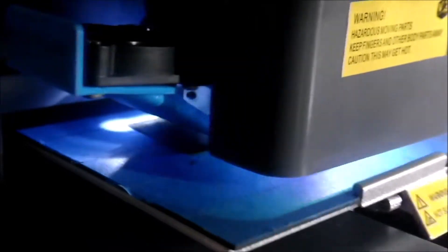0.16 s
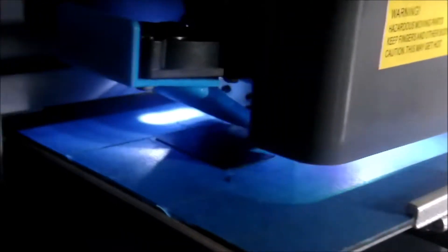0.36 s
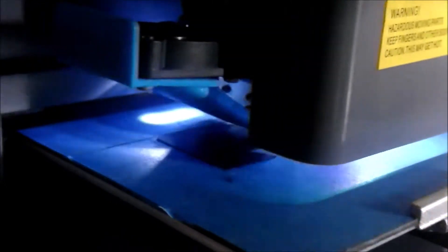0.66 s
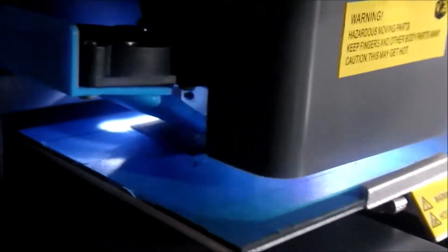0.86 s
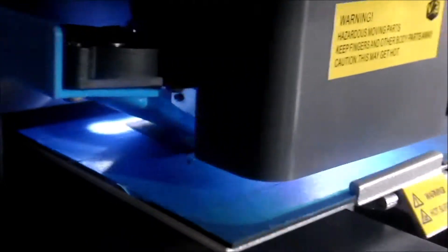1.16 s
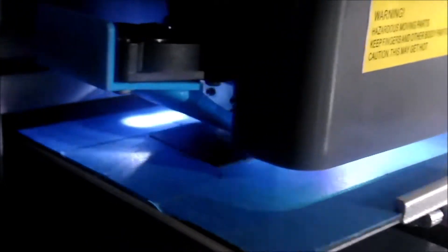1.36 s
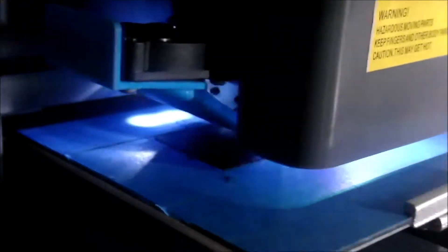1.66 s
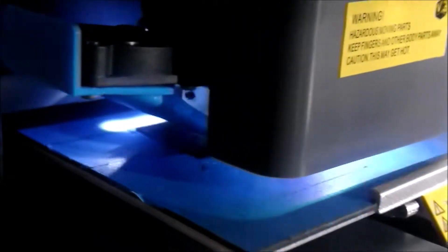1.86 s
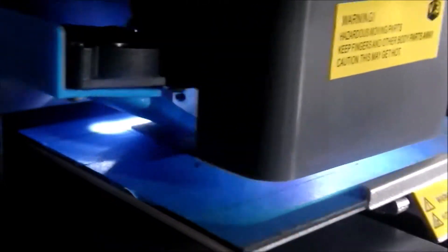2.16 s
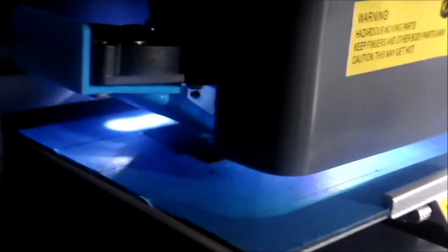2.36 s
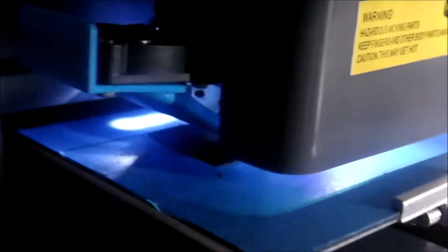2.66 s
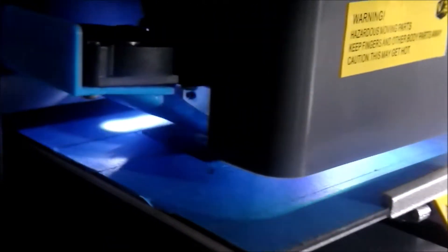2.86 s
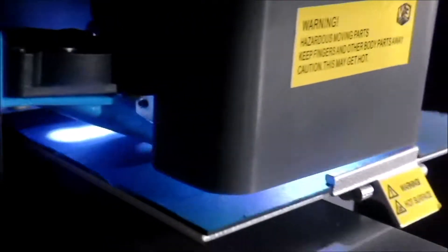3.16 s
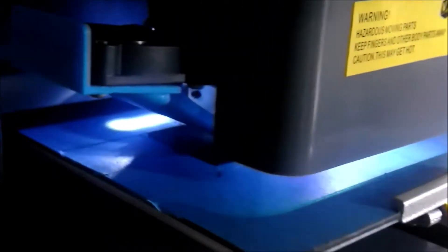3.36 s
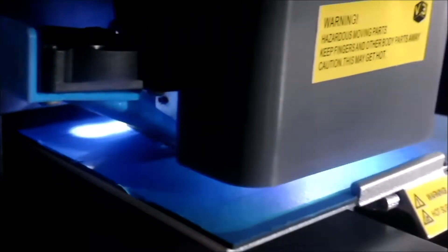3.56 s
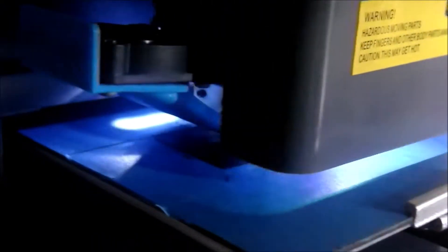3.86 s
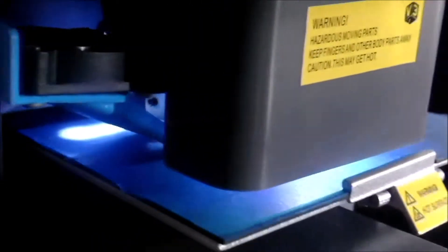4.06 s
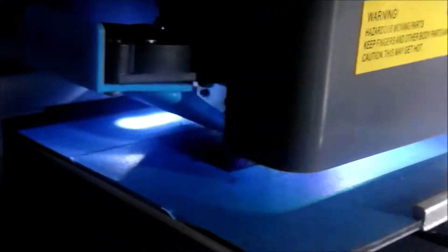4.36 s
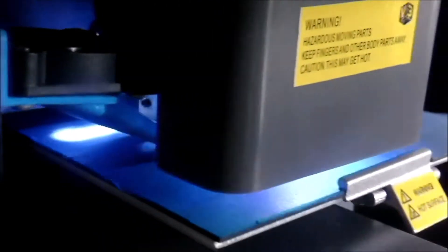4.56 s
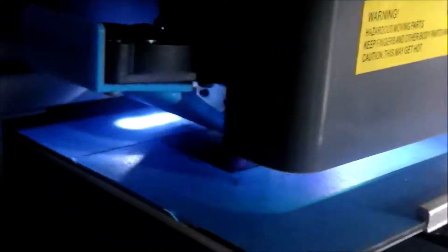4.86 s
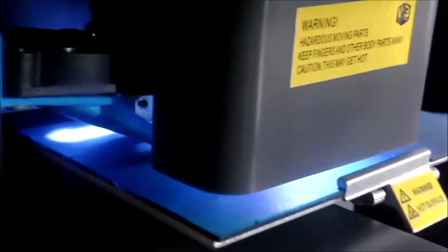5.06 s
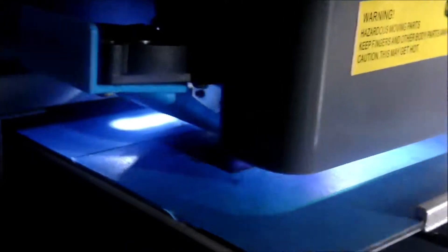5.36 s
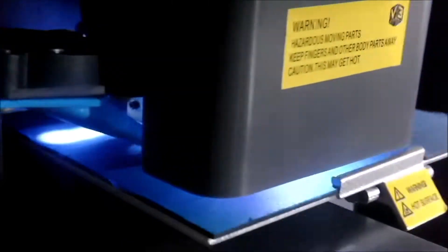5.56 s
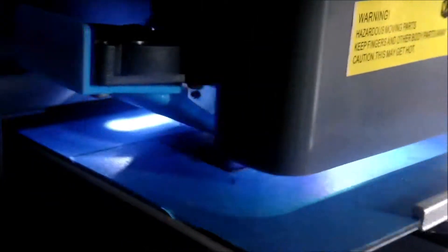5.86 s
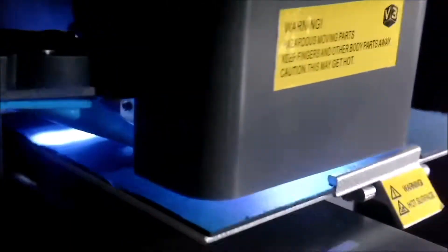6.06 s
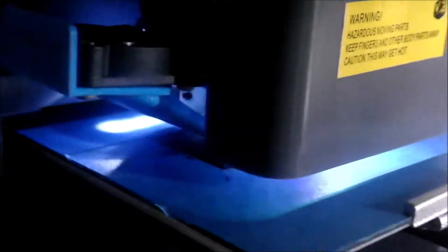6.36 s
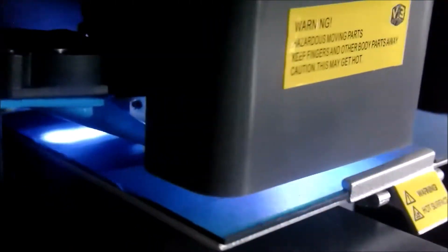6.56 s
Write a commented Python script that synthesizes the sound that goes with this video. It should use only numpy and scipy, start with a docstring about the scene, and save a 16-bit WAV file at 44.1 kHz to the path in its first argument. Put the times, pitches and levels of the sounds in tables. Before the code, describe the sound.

Close by, a small 3D printer whines and rattles through rapid short strokes, jolting at every reversal over constant airy fan noise.

```python
"""Desktop 3D printer at work

A desktop 3D printer fills a layer in short back-and-forth strokes, heard in mono from nearby.
The stepper motors whine at multiples of their step rate; each turn slows them and jolts the frame.
A loose part on the carriage buzzes with the steps and clacks, as filtered noise and cosines.
Sharp ticks ring out; behind all this, shaped noise and steady tones make fans and driver whistles."""
import sys
import numpy as np
from scipy import signal
from scipy.fft import rfft, irfft
from scipy.io import wavfile
from scipy.ndimage import uniform_filter1d

SR = 44100
rng = np.random.default_rng(int(sys.argv[2]) if len(sys.argv) > 2 else 0)


def generate_wav(sig):
    """Save sig (samples, or channels by samples) to the path in sys.argv[1] as 16-bit PCM at SR."""
    pcm = np.round(np.clip(np.atleast_2d(sig).T, -1, 1) * 32767).astype(np.int16)
    wavfile.write(sys.argv[1], SR, pcm)


N = 296352  # length in samples
T = np.arange(N) / SR  # time in s
STEP_HZ = 640.8  # motor steps per second at cruising speed


def amp(db):
    """Turn decibels into an amplitude factor."""
    return 10 ** (np.asarray(db) / 20)


def evened(x):
    """Scale a signal to rms 1."""
    return x / np.sqrt(np.mean(x ** 2) + 1e-20)


def drift(hz):
    """Smooth random wander of rms 1; changes faster than about hz fade away."""
    spectrum = rfft(rng.standard_normal(N))
    rolloff = 1 + (np.fft.rfftfreq(N, 1 / SR) / hz) ** 4
    return evened(irfft(spectrum / rolloff, N))


def resonate(x, hz, width):
    """Two-pole resonance of gain 1 at its centre; a narrow width [Hz] rings longer."""
    r = np.exp(-np.pi * width / SR)
    feedback = [1, -2 * r * np.cos(2 * np.pi * hz / SR), r * r]
    return signal.lfilter([(1 - r * r) / 2, 0, (r * r - 1) / 2], feedback, x)


def body(x, modes):
    """A solid body answers a push with several resonances at once."""
    return sum(amp(db) * resonate(x, hz, width) for hz, width, db in modes)


def multiples(phase, orders):
    """Cosines locked to the step cycle, each wandering in level and slightly in phase."""
    return sum(amp(db + 2.8 * drift(30)) * np.cos(k * phase + 0.01 * k * drift(40))
               for k, db in orders)


# colour of the air noise, only its shape counts: (frequency [Hz], relative level [dB per Hz])
FANS = [(15, -50), (30, -24.5), (95, -26.5), (300, -23.5), (430, -25), (650, -15.5), (820, -20.5),
        (1400, -16), (2100, -18), (3100, -11.5), (4200, -18.5), (5500, -11.5), (6700, -14.5), (7400, -29),
        (9500, -21), (11500, -21.5), (14500, -27.5), (15800, -24.5)]
# air ducts boost or notch the noise: (frequency [Hz], width [Hz], change [dB])
DUCT = [(960, 320, 7), (1757, 166, 8.5), (2285, 360, 9.5), (3146, 110, 5), (490, 130, 3.5), (560, 28, -5),
        (826, 50, -27), (1416, 73, -2.5), (3700, 200, -2)]
FANS_DB = -47  # rms


def fans():
    """Air noise with drifting patches and a level flicker, coloured by the ducts."""
    frames, hz = N // 256 + 5, np.fft.rfftfreq(1024, 1 / SR)
    real, imaginary, patches = rng.standard_normal((frames, 513, 3)).T
    patches = evened(uniform_filter1d(uniform_filter1d(patches, 10, 0), 8, 1))
    colour_hz, colour_db = np.transpose(FANS)
    db = np.interp(np.log(hz + 1), np.log(colour_hz + 1), colour_db)
    db = db + sum(change_db / (1 + (2 * (hz - centre) / width) ** 2) for centre, width, change_db in DUCT)
    flicker = evened(uniform_filter1d(rng.standard_normal(frames), 3))
    spectrum = (real + 1j * imaginary) * amp(db[:, None] + 1.45 * patches + 1.54 * flicker)
    air = signal.istft(spectrum, nperseg=1024, noverlap=768)[1][:N]
    return amp(FANS_DB) * evened(air)


# steady fan hums and driver whistles: (frequency [Hz])
TONES_HZ = [480, 807.5, 914.5, 961, 1007, 1305.5, 1519.4, 1602, 1822, 2610.9, 3006, 3936.5, 9350, 10622,
            11077, 11169, 11716.8, 11810, 12264.5, 12813, 13000, 15074, 15622.5]
# the same tones in the same order: (mean level [dB], rms pitch waver [Hz])
TONES = [(-74, 8), (-73, 1), (-64, 6), (-74, 3), (-63, 4), (-67, 1), (-69, 3), (-71, 5), (-67, 9),
         (-57, .8), (-68, 4), (-70, 3), (-72, 12), (-79, 3), (-76, 3), (-55, 1.8), (-54, 1.2), (-76, 3),
         (-62, 1.5), (-75, 2), (-80, 3), (-81, 1.5), (-77, 1.5)]


def tones():
    """Fan hums and driver whistles, each wavering a little in pitch and level."""
    out = 0
    for hz, (db, waver_hz) in zip(TONES_HZ, TONES):
        level = np.sqrt(2) * amp(db + 1.17 * drift(35))
        phase = 2 * np.pi * np.cumsum(hz + waver_hz * drift(20.6)) / SR
        out = out + level * np.cos(phase)
    return out


# sharp ticks: (time [s], ring level before its fade [dB], ring pitch [Hz], time to fade by 60 dB [s],
# snap peak [dB])
TICKS = [(1.5003, -36, 4050, .025, -25), (1.501, -29, 4090, 0.018, -32), (1.5035, -35, 2590, .03, -38),
         (1.5078, -30.5, 3260, 0.025, -38), (1.8445, -32, 3950, 0.025, -36), (1.8385, -37, 3700, .03, -44),
         (1.849, -32, 3200, 0.032, -40), (1.853, -36, 3170, .02, -39)]


def ticks():
    """A bright snap and a short rough ring: a sine mixed with noise around its pitch."""
    out, t = np.zeros(N), T[:3000]
    for (s, db, hz, t60, snap_db), noise in zip(TICKS, rng.standard_normal((len(TICKS), len(t)))):
        rough = np.sin(2 * np.pi * hz * t) + 0.67 * resonate(noise, hz, 1600)
        ring = amp(db - 60 * t / t60) * rough * np.minimum(t / 0.0011, 1)
        burst = noise * np.exp(-t / 0.00098)
        snap = resonate(resonate(burst, 4100, 7000), 4900, 8000)
        out[round(s * SR):][:len(t)] += ring + amp(snap_db) * snap / abs(snap).max()
    return out


# turns of the carriage, the first one starting an outward stroke: (time [s], low jolt peak [dB],
# low jolt pitch [Hz], middle peak [dB], upper peak [dB]); peaks are before the bass is cut
TURNS = [(0.094, -48, 515, -41, -38), (0.244, -51, 527, -39, -38.5), (0.402, -45.5, 474, -39, -38),
         (0.561, -39, 520, -43, -39), (0.725, -45.5, 493, -39, -34), (0.887, -44, 519, -43.5, -35.5),
         (1.048, -44, 490, -39, -40), (1.211, -44.5, 522, -48, -36.5), (1.375, -42, 477, -39, -35.5),
         (1.534, -41.5, 518, -41, -38), (1.699, -53, 470, -46, -39), (1.86, -44.5, 496, -38, -41),
         (2.026, -42.5, 490, -41, -36), (2.184, -40, 523, -41.5, -35), (2.35, -55, 474, -42.5, -39),
         (2.512, -52, 470, -42, -37.5), (2.672, -43, 450, -37, -36.5), (2.829, -42, 515, -44, -40),
         (2.996, -44.5, 472, -40, -34), (3.154, -44, 480, -41, -37), (3.235, -39.5, 523, -39.5, -43),
         (3.319, -55, 540, -43, -36), (3.472, -45, 477, -39.5, -36.5), (3.709, -43.5, 466, -35.5, -38),
         (3.946, -51, 477, -42, -37), (4.188, -48, 494, -38.5, -36), (4.43, -44, 480, -43, -37),
         (4.672, -39, 518, -40.5, -34.5), (4.922, -48, 518, -57, -41), (5.172, -41, 466, -44, -35),
         (5.42, -46.5, 533, -41, -38.5), (5.662, -49, 500, -46, -38), (5.9, -63, 490, -39.5, -38),
         (6.135, -46.5, 507, -46, -38), (6.374, -48, 492, -42, -37), (6.614, -45.5, 494, -41, -37)]
# low ringing modes of the frame: (frequency [Hz], width [Hz], relative level [dB])
LOWER = [(480, 25, 1.5), (524.5, 37, -0.5), (715, 23, 10)]
# middle ringing modes of the frame: (frequency [Hz], width [Hz], relative level [dB])
MIDDLE = [(908, 12, -1.5), (1002, 28, 3.5), (1042, 33, 4.5), (1128, 47, -7)]
# upper ringing modes of the frame: (frequency [Hz], width [Hz], relative level [dB])
UPPER = [(1350, 57, -3), (1650, 43, 5.5), (1837, 13.7, 12), (2390, 220, 1.5), (2900, 36, -2)]
MIDDLE_HZ, MIDDLE_SPREAD_HZ = 1034, 35  # mean pitch of the middle push and its chance from turn to turn


def jolts():
    """Each turn sways and shakes the frame for a few milliseconds and its modes ring out."""
    out, t = np.zeros(N + 4000), T[:4000]
    chance = rng.standard_normal((len(TURNS), len(t) + 1))
    for (s, low_db, hz, middle_db, upper_db), (spread, *noise) in zip(TURNS, chance):
        shake = noise * np.exp(-((t - .009) / 0.013) ** 2)
        middle_hz = MIDDLE_HZ + MIDDLE_SPREAD_HZ * spread
        low_push = np.sin(2 * np.pi * hz * t) * np.exp(-((t - .009) / 0.0058) ** 2)
        middle_push = np.sin(2 * np.pi * middle_hz * t) * np.exp(-((t - .006) / 0.0036) ** 2)
        low = body(low_push + 1.76 * shake, LOWER)
        middle = body(middle_push + 3.7 * shake, MIDDLE)
        upper = body(shake, UPPER) + 0.12 * resonate(shake, 1900, 3400)
        bands = (low_db, low), (middle_db, middle), (upper_db, upper)
        # each jolt begins 4 ms before the listed time
        out[round((s - .004) * SR):][:len(t)] += sum(amp(db) * x / abs(x).max() for db, x in bands)
    bass_cut = signal.butter(4, 410, "high", fs=SR, output="sos")  # the low end below about 410 Hz is cut away
    return signal.sosfilt(bass_cut, out[:N])


# the loose part clacks: (time [s], peak level [dB])
CLACKS = [(0.4065, -32.5), (0.4379, -34.5), (0.7337, -35), (0.9477, -38.5), (1.0545, -33), (1.3309, -32.5),
          (1.3558, -35), (1.5374, -36), (1.6362, -38), (1.702, -31.5), (1.8452, -41), (1.9405, -33.5),
          (2.0293, -32), (2.6005, -38), (2.6289, -34), (2.6768, -34.5), (2.6833, -30.5), (2.9642, -34.5),
          (3.0031, -29), (3.487, -34.5), (3.5069, -36.5), (3.8801, -40), (3.9594, -38), (4.4338, -33.5),
          (5.3901, -36), (5.4236, -30.5), (5.673, -31.5), (5.9085, -33), (6.0257, -37.5), (6.116, -31.5),
          (6.3315, -31)]
CLACK_HZ, CLACK_SPREAD_HZ = 6640, 98  # mean of the first resonance and its chance from clack to clack


def clacks():
    """Noise bursts of a few milliseconds through two resonances of the loose part."""
    out, t = np.zeros(N + 1500), T[:1500]
    for (s, db), noise in zip(CLACKS, rng.standard_normal((len(CLACKS), len(t)))):
        hz = CLACK_HZ + CLACK_SPREAD_HZ * noise[0]
        burst = noise * (t / .0015) * np.exp(-t / 0.0013)
        ring = resonate(resonate(burst, hz, 390), 6090, 510)
        out[round(s * SR):][:len(t)] += amp(db) * ring / abs(ring).max()
    return out[:N]


# the buzz swells on the way into a turn: (start [s], end [s], buzz level [dB], bright edge level [dB],
# share locked to the steps [0-1])
SWELLS = [(0, 0.165, -51.5, -58, .4), (0.277, 0.493, -51.5, -56, .25), (0.626, 0.808, -50, -57, 0.36),
          (.93, 1.12, -50.5, -56, .25), (1.25, 1.43, -48, -56, 0.13), (1.598, 1.747, -48.5, -56, .15),
          (1.798, 1.863, -53, -58, 0.8), (1.914, 2.15, -51.5, -56.5, 0.2), (2.25, 2.412, -50, -58, 0.17),
          (2.577, 2.77, -48.5, -55, 0.13), (2.908, 3.072, -51.5, -58, 0.3), (3.114, 3.25, -53.5, -61, 0.6),
          (3.356, 3.517, -48.5, -56, 0.14), (3.576, 3.71, -45, -52.5, 0.42),
          (3.844, 4.002, -49.5, -57, 0.16), (4.077, 4.225, -47, -54, 0.35), (4.31, 4.48, -49.5, -56, 0.13),
          (4.522, 4.698, -47, -54.5, .3), (4.822, 4.965, -48, -57, .2), (5.013, 5.21, -47, -55.5, .5),
          (5.315, 5.46, -50, -55, 0.1), (5.52, 5.686, -47.5, -56, 0.44), (5.807, 5.95, -48.5, -59, .2),
          (5.956, 6.165, -44, -52.5, 0.23), (6.28, 6.42, -49.5, -55, .15), (6.47, 6.646, -46, -53.5, 0.2)]
REST_DB, REST_EDGE_DB, REST_LOCKED = -60.5, -64, .12  # the same three settings between swells
SWELL_START = .7  # share of the swell reached after the attack
ATTACK_S, HOLD_S, RELEASE_S = 0.0094, 0.038, 0.017


def swells():
    """The buzz sets in, grows, holds and dies: level, edge level, locked share."""
    rest = np.array([REST_DB, REST_EDGE_DB, REST_LOCKED])[:, None]
    out = rest * np.ones(N)
    for start, end, *top in SWELLS:
        times = [start, start + ATTACK_S, end - HOLD_S, end, end + RELEASE_S]
        shape = np.interp(T, times, [0, SWELL_START, 1, 1, 0])
        out += (np.array(top)[:, None] - rest) * shape
    return out


# clean part of the buzz: (multiple of the step rate, relative level [dB])
BUZZ_ORDERS = [(7, -3.5), (8, 3), (9, -3.5), (10, 3.5), (11, -0.5), (13, -22)]
# resonances of the buzz noise, passed twice: (frequency [Hz], width [Hz], relative level per pass [dB])
BUZZ_BODY = [(5200, 270, -5), (6130, 400, 1), (6400, 115, 2.5), (6520, 73, -7), (6720, 160, -2.5)]
# clean part of the bright edge: (multiple of the step rate, level relative to the edge level [dB])
EDGE_ORDERS = [(14, -6), (15, -19), (16, -8), (17, -22), (20, -12)]
# resonances of the edge noise, passed twice: (frequency [Hz], width [Hz], relative level per pass [dB])
EDGE_BODY = [(9165, 100, 8.5), (9720, 500, 0), (10020, 190, 5.5), (12500, 3600, 2.5)]
# these never stop: (multiple of the step rate, amplitude before its wander [dB])
STEADY_ORDERS = [(9, -61), (8, -78)]


def buzz(phase, brake):
    """A loose part rattles once a step: part clean multiples, part pulsing noise in its resonances."""
    db, edge_db, locked = swells()
    locked = np.clip(locked - 3.1 * brake, 0, 1)  # braking loosens the lock
    rattle = (1 + 0.35 * np.cos(phase)) * amp(3.85 * drift(220)) * rng.standard_normal(N)
    low = np.sqrt(locked) * evened(multiples(phase, BUZZ_ORDERS))
    low += np.sqrt(1 - locked) * evened(body(body(rattle, BUZZ_BODY), BUZZ_BODY))
    edge = np.sqrt(locked) * multiples(phase, EDGE_ORDERS)
    edge += evened(body(body(rattle, EDGE_BODY), EDGE_BODY))
    return amp(db) * low + amp(edge_db) * edge + multiples(phase, STEADY_ORDERS)


def travel():
    """Strokes run so far: whole numbers fall on the turns."""
    s = [row[0] for row in TURNS]
    s = [2 * s[0] - s[1]] + s + [2 * s[-1] - s[-2]]  # one more turn beyond each end
    return np.interp(T, s, np.arange(len(s)))


# the motors fall into step differently after each turn, stroke by stroke: (change of multiple 3 [dB],
# change of multiple 5 [dB], steps lost in the turn that ends the stroke)
STROKES = [(0.5, 1.5, 1.96), (-1.5, -3, 2.2), (2, 0.5, 1.92), (3, -3, 2.32), (-2.5, 2, 2.07),
           (-1.5, -3, 2.39), (1, -1, 1.77), (0, 0, 2.54), (1, -2.5, 2.41), (-1, -1, 2.14), (2.5, -3, 2.23),
           (0, -1, 1.93), (-2.5, -5, 2.14), (1, -0.5, 2.41), (2.5, -1.5, 2.12), (0.5, 0.5, 2.15),
           (0, 1, 1.89), (0, 1, 2.27), (-2, 4, 2.03), (-0.5, 1.5, 1.92), (2.5, -9, 1.77), (3, 1, 2.48),
           (-1, 5, 1.7), (1.5, 1, 1.79), (0.5, 1.5, 2.57), (-1, 0.5, 1.99), (0.5, 0, 2.4), (1, 2.5, 2.35),
           (-1, 1.5, 2.05), (2.5, -0.5, 2.48), (2.5, 1, 2.57), (2, 1, 1.64), (0.5, 1, 1.6),
           (1.5, 0.5, 2.09), (-3.5, -2, 2.12), (0, -2.5, 2.2), (2, 3.5, 2.1)]
BRAKE_S, BRAKE_LAG_S = 0.0071, 0.00323  # each ramp, and how long after the listed turn time it is slowest


def braking():
    """Share of the speed lost: 0 when cruising, straight ramps down into each turn and out."""
    dips = []
    for (s, *_), (*_, lost) in zip(TURNS, STROKES):
        ramps = np.clip(1 - abs(T - s - BRAKE_LAG_S) / BRAKE_S, 0, 1)
        dips.append(lost / (BRAKE_S * STEP_HZ) * ramps)
    return np.max(dips, axis=0)


def steps(brake):
    """Phase of the step cycle: the rate sags through every turn."""
    return 2 * np.pi * np.cumsum(STEP_HZ * (1 - brake)) / SR


# multiples 2 to 6 of the step rate, before the frame's resonance: (outward stroke start [dB], its end [dB],
# return stroke start [dB], its end [dB], rms wander [dB])
WHINE = [(-65, -60.5, -60.5, -60, 2.1), (-54.5, -54, -54, -52.5, 0.65), (-59.5, -60, -59, -60, 1.8),
         (-51.5, -54.5, -55.5, -55, 1.2), (-59, -62, -65.5, -63.5, 2.8)]
HUM_DB, WANDER_HZ = -48.5, 9.6  # level of the step rate itself, the same on all strokes; speed of the wander
REBOUND_S, REBOUND_DB = 0.026, -9  # delay of the second dip, and its depth per full loss of speed


def whine(phase, brake):
    """Step-rate multiples vary with place and direction; the frame builds each up again after a turn."""
    stroke = travel()
    along, back = stroke % 1, 1 - np.floor(stroke) % 2  # back is 1 on return strokes
    levels = [HUM_DB]
    for out_start, out_end, back_start, back_end, wander_db in WHINE:
        outward = out_start + (out_end - out_start) * along
        homeward = back_start + (back_end - back_start) * along
        levels.append((1 - back) * outward + back * homeward + wander_db * drift(WANDER_HZ))
    third_db, fifth_db, _ = np.array(STROKES)[stroke.astype(int)].T
    levels[2], levels[4] = levels[2] + third_db, levels[4] + fifth_db
    # the carriage rebounds after a turn and the whine dips once more
    rebound = REBOUND_DB * np.interp(T - REBOUND_S, T, brake)
    out = 0
    for k, db in enumerate(levels, 1):
        db = db + (1.0 + 0.11 * k) * drift(12.5)
        db = db - 11.0 * brake + rebound  # the whine fades as the steps slow
        wobble = 0.037 * k ** 1.6 * drift(34)
        tone = np.sqrt(2) * amp(db) * np.cos(k * phase + wobble + k * k)
        out = out + 0.13 * tone + 1.18 * resonate(tone, STEP_HZ * k, 22 + 12 * k)
    return out


def scene():
    """All sources share one pattern of turns and add up to mono, sent to both channels."""
    brake = braking()
    phase = steps(brake)
    mono = fans() + tones() + ticks() + jolts() + clacks() + buzz(phase, brake) + whine(phase, brake)
    return np.array([mono, mono])


EDGE_HZ = 15760  # highest pitch let through


def record(dry):
    """The band limit: a steep low-pass filter removes the highest treble."""
    lowpass = signal.firwin(1023, EDGE_HZ, window=("kaiser", 9), fs=SR)
    return signal.oaconvolve(dry, lowpass[None], "same")


dry = scene()
out = record(dry)
generate_wav(out)
```